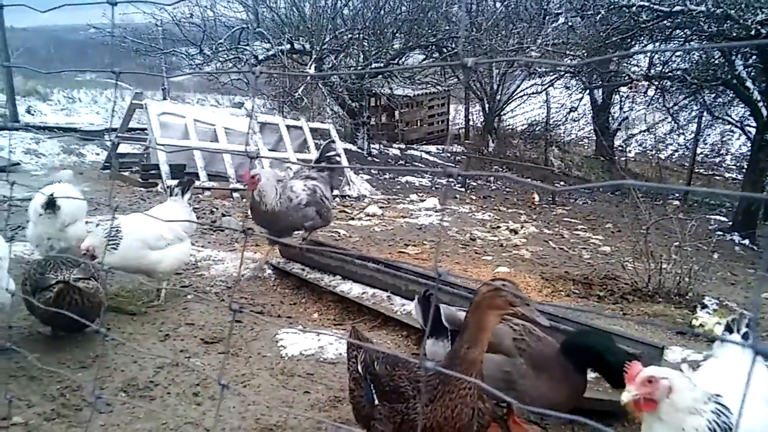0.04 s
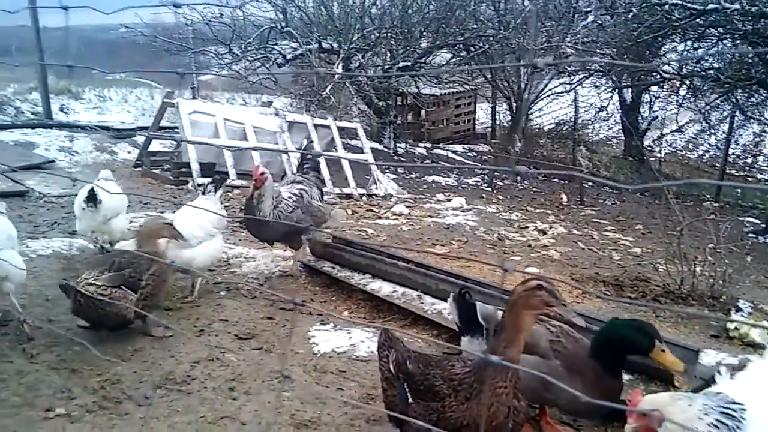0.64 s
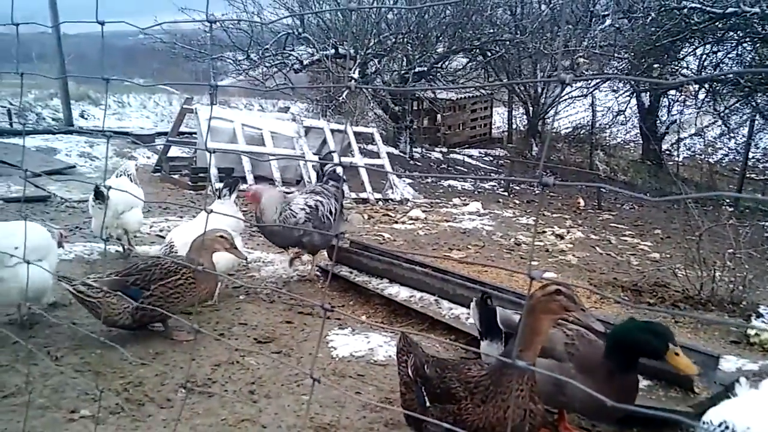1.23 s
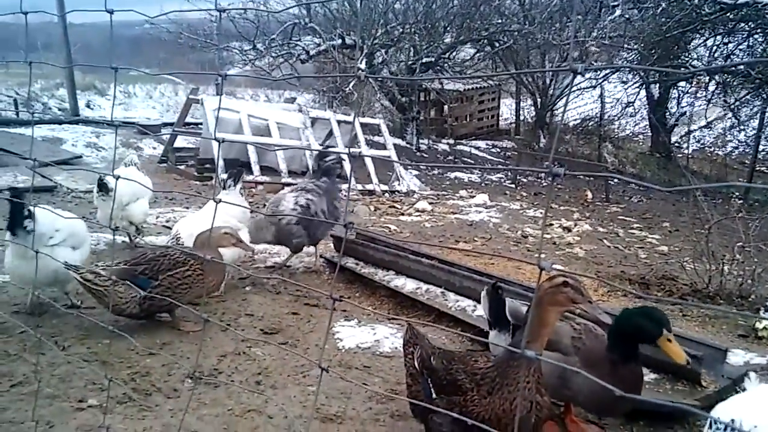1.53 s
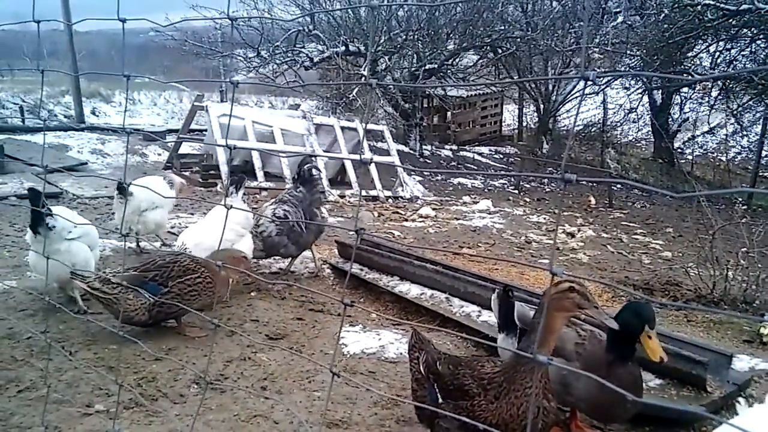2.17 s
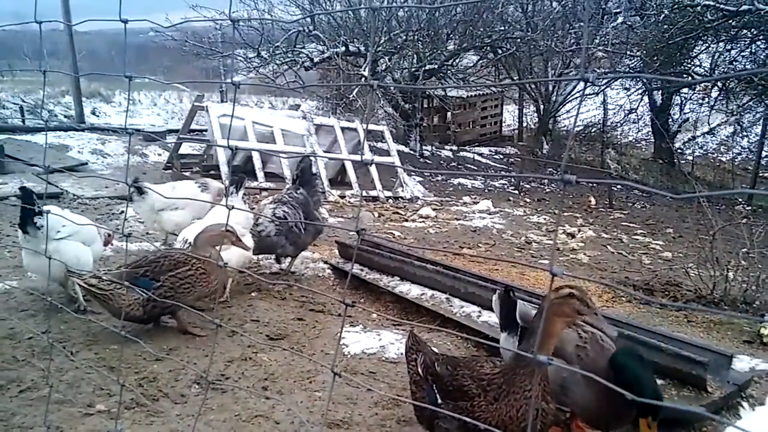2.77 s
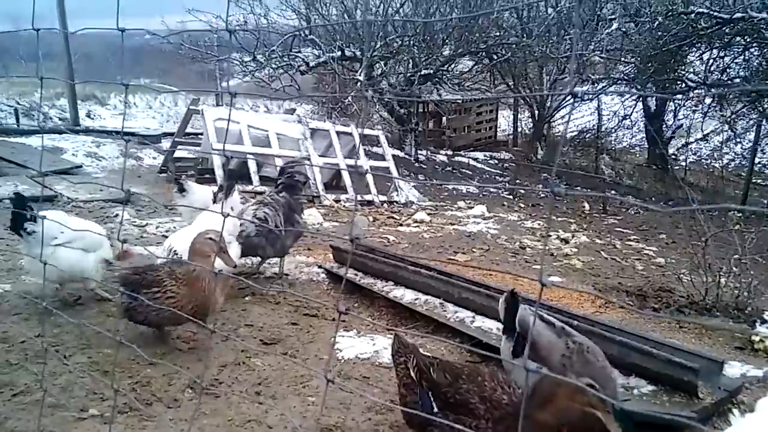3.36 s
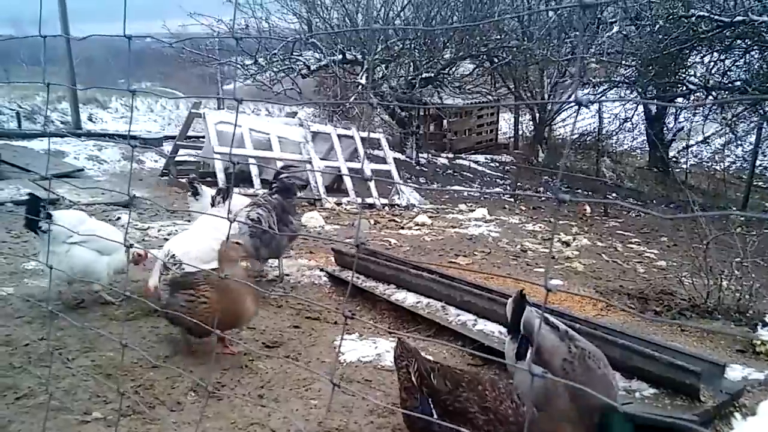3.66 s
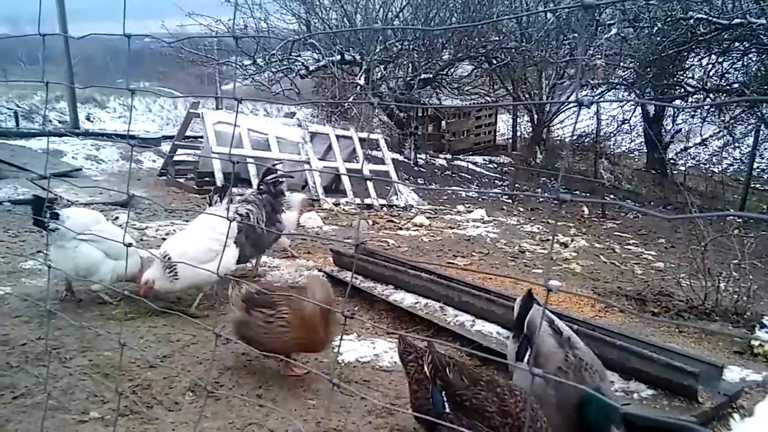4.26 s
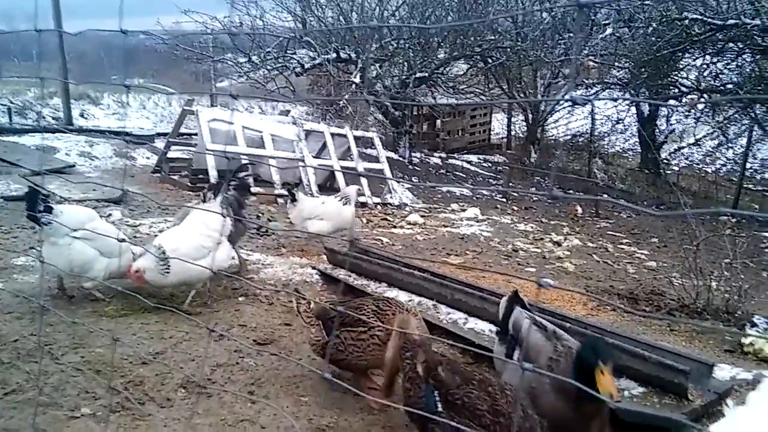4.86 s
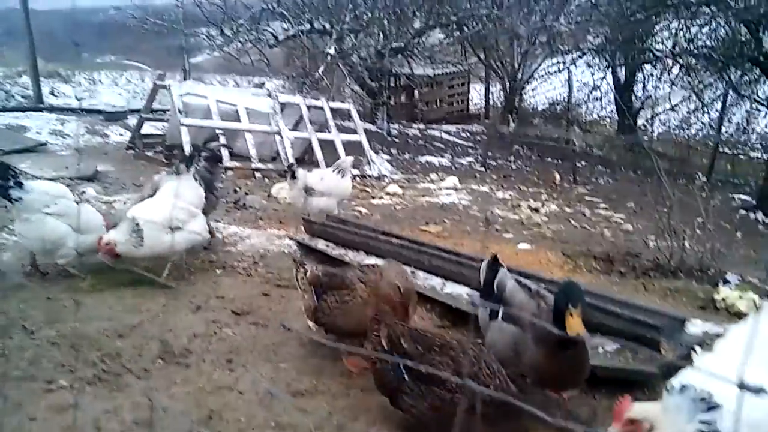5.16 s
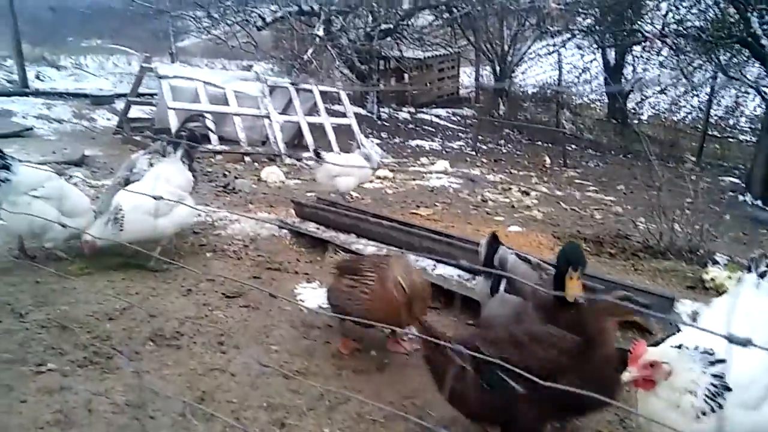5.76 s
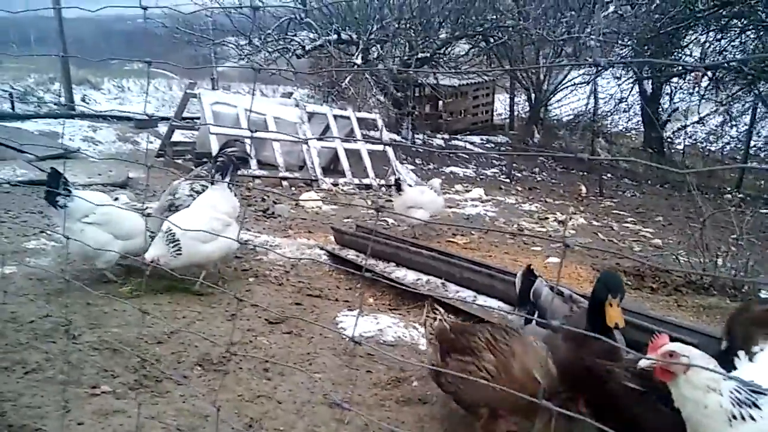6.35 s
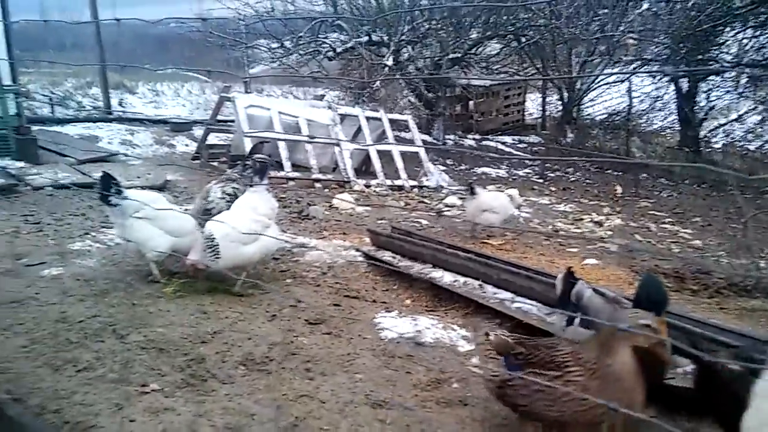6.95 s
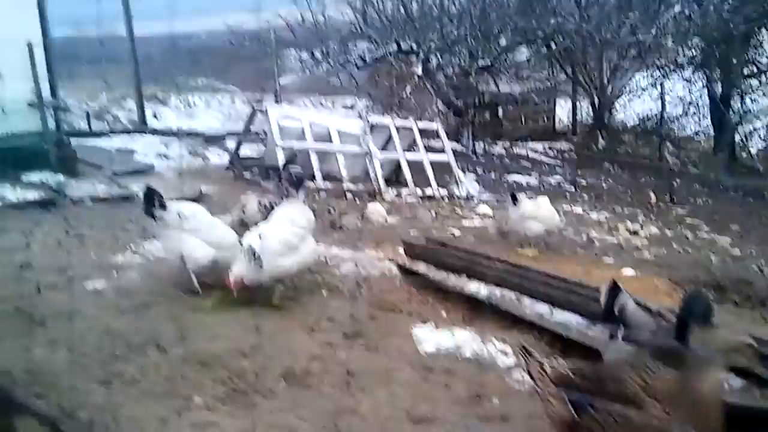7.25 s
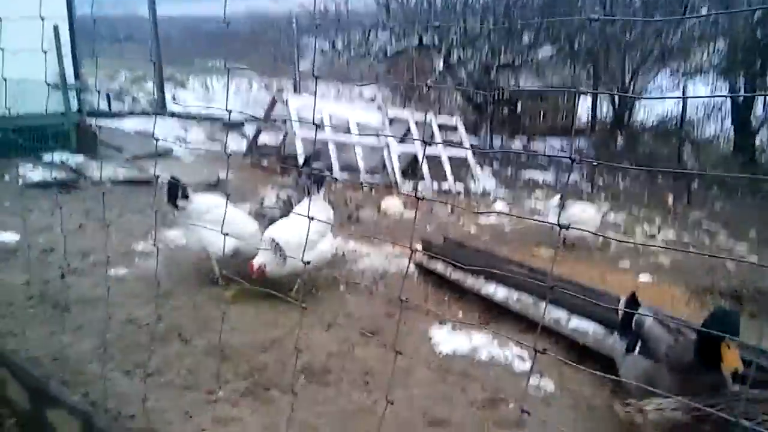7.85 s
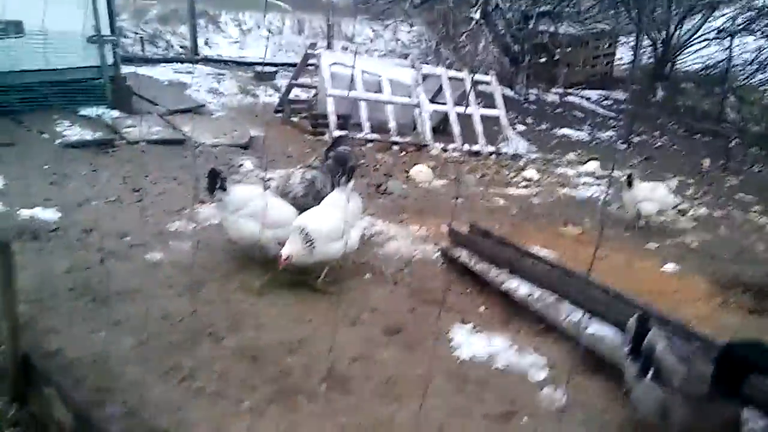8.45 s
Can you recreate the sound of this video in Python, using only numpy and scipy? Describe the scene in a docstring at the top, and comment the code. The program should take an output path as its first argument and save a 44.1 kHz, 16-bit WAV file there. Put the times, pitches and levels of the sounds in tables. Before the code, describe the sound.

A duck clucks hoarsely up close in a farmyard, with soft drake rasps, quiet hen whines and bills pecking and rustling in feed.

```python
"""Ducks and hens at a winter trough

Up close, a duck fires off hoarse clucks, uneven pulses ringing throat and bill, some breaking into a squeal.
A drake rasps in soft puffs of breath; hens whine and murmur in quavering notes. Bills tick on the trough
and rustle in the feed, and feathers brush past once. Behind the open farmyard a low rush swells and fades."""
import sys
import numpy as np
from scipy import signal
from scipy.io import wavfile

SR = 44100
rng = np.random.default_rng(int(sys.argv[2]) if len(sys.argv) > 2 else 0)


def waveform_to_disk(signal):
    """Save audio, clipped to [-1, 1], as 16-bit WAV at the path in sys.argv[1]."""
    frames = np.transpose(np.atleast_2d(signal))
    scaled = np.clip(frames, -1, 1) * 32767
    samples = np.round(scaled).astype(np.int16)
    wavfile.write(sys.argv[1], SR, samples)


N = 375291
TIME = np.arange(N) / SR

# duck clucks: peak t/s, spread/s, pitch/Hz, mouth resonance/Hz, mouth level/dB, bill over mouth/dB
DUCK_CLUCKS = [(4.192, 0.0034, 233, 1880, -17.5, -1), (4.218, 0.0063, 217.6, 1540, -33, 1),
               (4.496, 0.0021, 206.2, 1940, -26, -1), (4.63, 0.0031, 211, 1810, -41, 3),
               (4.651, 0.0032, 242.8, 1730, -19, -7.5), (4.778, 0.0043, 245.5, 1620, -20.5, 1.5),
               (5.137, 0.0062, 198, 1610, -29, 8), (5.371, .003, 284.5, 2010, -32, 1),
               (5.442, 0.0096, 277, 2020, -37.5, -1.5), (5.469, 0.008, 275.3, 1990, -21.5, 0.5),
               (5.691, 0.0069, 242.4, 1840, -18.5, -5), (5.832, 0.0066, 271, 1820, -19.5, -4.5),
               (5.964, 0.0065, 256.6, 1850, -19, 3), (6.102, 0.0041, 197, 1860, -40, 0),
               (6.135, 0.0054, 223, 1780, -21.5, -3), (6.251, 0.0025, 260, 1770, -33.5, -4.5),
               (6.277, 0.0045, 230.4, 1630, -23.5, -7), (6.78, 0.0062, 244.1, 1821, -21, -6.5)]
# resonances below and above the duck's mouth: part (0 chest, 2 bill, 3 high edge), f/Hz, width/Hz, gain/dB
DUCK_RESONANCES = [(0, 242, 168.9, 2), (0, 513, 240, -6.5), (0, 763, 300, 4.5), (2, 3236, 480, 11.5),
                   (2, 4010, 520, 12.5), (3, 5763, 1200, -4), (3, 7780, 1100, -2), (3, 11500, 3500, -18)]
# duck squeals: t/s, length/s, top pitch/Hz, level/dB
DUCK_SQUEALS = [(4.473, 0.092, 888, -34.5), (4.783, 0.107, 1010, -32.5), (5.078, 0.13, 1023, -34.5),
                (5.335, 0.023, 1276, -27.5), (5.389, 0.078, 943, -33)]
# the duck's upward squeak: t/s, length/s, first pitch/Hz, last pitch/Hz, level/dB
DUCK_SQUEAKS = [(6.405, 0.033, 1770, 3850, -36)]
# throat colour of squeal and squeak: f/Hz, gain/dB
SQUEAL_EQ = [(400, 38), (1000, -14), (1900, -21.5), (2700, -25.5), (3800, -22), (4800, -38), (9000, -49)]
# drake rasps: t/s, length/s, throat resonance/Hz, relative level/dB, buzz over throat/dB
DRAKE_RASPS = [(1.306, .024, 1380, -57, -18), (2.967, 0.034, 1470, -50, 0.5),
               (3.093, 0.045, 1510, -48.5, -3), (3.577, .049, 1350, -45, -25),
               (3.678, 0.054, 1290, -50, -34), (4.865, .056, 1620, -45, -11),
               (5.544, 0.049, 1520, -46, -13), (6.312, 0.08, 1550, -42, -9),
               (6.718, 0.031, 1570, -46.5, -9.5), (6.949, .06, 1450, -37, -9.5),
               (7.534, 0.062, 1310, -44.5, -10), (7.612, 0.034, 1360, -46, -13.5),
               (8.259, 0.049, 1340, -45, -29), (8.385, .039, 1240, -50, -26)]
# a hen's whine, its catch and soft clucks: t/s, length/s, first pitch/Hz, last pitch/Hz, level/dB
HEN_CALLS = [(0, 0.31, 432, 450, -44.5), (.3, 0.052, 408, 370, -51.5), (.342, 0.055, 402, 455, -44),
             (.59, 0.074, 401, 340, -46.5), (1.08, 0.068, 365, 310, -48.5)]
# the hen's throat colour: f/Hz, gain/dB
HEN_EQ = [(330, 13.5), (440, 1.5), (680, 12.5), (880, 6), (1300, -9.5), (1800, -21), (3000, -58),
          (5000, -50)]
# a hen's murmurs: t/s, length/s, first pitch/Hz, last pitch/Hz, level/dB
HEN_MURMURS = [(.4, 0.151, 474, 527, -56.5), (.675, .14, 473, 505, -57)]
# muffled colour of a closed beak: f/Hz, gain/dB
MURMUR_EQ = [(500, -3), (1000, -23), (2000, -28), (5000, -62)]
# pecks on grain and trough: t/s, peak level/dB, ring f/Hz
BILL_PECKS = [(.301, -34.5, 3430), (0.724, -35, 2464), (1.457, -42, 470), (1.505, -32, 3900),
              (1.694, -41, 4300), (1.736, -34.5, 6700), (2.001, -32.5, 11400), (3.42, -37.5, 6050),
              (4.393, -23.5, 3360), (4.412, -31, 2140), (4.74, -26.5, 3280), (4.962, -28, 5900),
              (6.458, -27, 740), (6.465, -33.5, 5500), (7.507, -26.5, 5060), (7.851, -31.5, 2360),
              (8.478, -36.5, 2414)]
# quick scrapes of a bill in the feed: t/s, relative level/dB
BILL_SCRAPES = [(.048, -48), (0.089, -45.5), (.154, -44.5), (0.27, -44.5), (.42, -46), (.665, -46.5),
                (1.051, -45.5), (1.113, -44.5), (2.937, -44), (4.095, -48.5), (6.458, -38.5)]
# bouts of dabbling and shuffling: t/s, length/s, relative level/dB
DABBLING_BOUTS = [(0, 0.56, -54), (0.96, 0.64, -57.5), (1.74, 0.22, -59.5), (2.53, .14, -61),
                  (2.89, 0.15, -64), (3.237, 0.22, -66.5), (4.003, 0.92, -60.5), (4.724, 0.39, -55),
                  (5.4, 0.976, -60), (6.34, 0.87, -58), (7.295, 0.4, -62.5), (7.814, 0.76, -61.5)]
# colour of the rustling feed: f/Hz, gain/dB
FEED_EQ = [(1000, 3), (2000, -13), (2900, -13.5), (3800, 3.5), (4600, -15), (5400, -21.5), (6600, 8.5),
           (8000, 4), (10000, -1.5), (16000, -6)]
# resonances of brushing feathers: f/Hz, width/Hz, gain/dB
FEATHER_RESONANCES = [(3500, 1000, 0), (6400, 910, -3), (10000, 4000, -11)]
# swell of the distant rush: t/s, drone level/dB, mids level/dB
RUSH_SWELL = [(0.9, -74, -70), (2.19, -65.5, -68), (2.42, -64.5, -71.5), (3.48, -54, -63),
              (3.67, -52.5, -58), (4.62, -46, -47), (5.26, -45.5, -49), (5.75, -48.5, -51),
              (6.51, -41.5, -46), (6.95, -51.5, -46.5), (7.76, -51, -62), (8.5, -62.5, -60.5)]
# swell of its hiss: t/s, level/dB
HISS_SWELL = [(2.3, -70.5), (3.2, -57.5), (3.8, -61.5), (5.3, -53.5), (7.7, -65), (8.5, -62.5)]
# colours of the rush's rumble, mids and hiss: f/Hz, gain/dB
RUMBLE_EQ = [(42, -24.5), (62, -10), (130, 2), (220, -1), (450, -10.5)]
MIDS_EQ = [(300, -20), (480, 1), (650, -2), (1000, -6.5), (1400, -19), (2500, -50)]
HISS_EQ = [(900, -16), (1400, 0), (2050, 5), (2700, -7.5), (3500, -7.5), (5000, -18)]


def duck_clucks(jitter=.05, sag=.028, shimmer_db=1.9, whistle=.016, mouth_width_hz=460, split=.14, closing=1.8):
    """Each cluck catches with a falling whistle, then slowing, uneven pulses ring throat and bill."""
    out, t, count = np.zeros(N), np.arange(-SR // 20, SR // 10) / SR, np.arange(-7, 13)
    for s, spread, pitch, mouth_hz, mouth_db, bill_over_db in DUCK_CLUCKS:
        times = (count + sag * count ** 2 + jitter * rng.standard_normal(len(count))) / pitch
        swell = np.exp(-(times / (2 * spread)) ** 2)
        linger = .054 * np.exp(-(times / (2 * spread) - 1.4) ** 2)
        creak = .05 * np.exp(-(times / (3.9 * spread)) ** 2)   # weak pulses lead in and out
        sizes = (swell + linger + creak) * from_db(shimmer_db * rng.standard_normal(len(count)))
        slaps = membrane_pulses(t, times, sizes)
        catch = whistle * np.exp(-((t + 2.1 * spread) / (.99 * spread)) ** 2)
        phase = 2 * np.pi * np.cumsum(950 * np.exp(-t / .053)) / SR
        breathy_tone = rng.standard_normal(len(t)) / 2 + sum(np.sin(k * phase) for k in range(1, 5))
        source = (slaps + catch * breathy_tone) * np.clip(t / spread / 2 + 2, 0, 1)
        # the mouth adds a close pair of resonances as part 1
        mouth_pair = [(1, mouth_hz * (1 - split), mouth_width_hz, .0059),
                      (1, mouth_hz * (1 + split), mouth_width_hz, .0046)]
        parts = np.zeros((4, len(t)))
        for k, (part, hz, width, db) in enumerate(DUCK_RESONANCES + mouth_pair):
            ring = resonate(resonate(source, hz, width), hz, width * 2)
            parts[round(part)] += (-1) ** k * from_db(db) * rms_one(ring)
        chest, mouth, bill, edge = parts
        mouth = np.interp(t - closing * t ** 2, t, mouth)   # its ring sinks as it closes
        bill = np.interp(t - .0009, t, bill)   # rings a moment after the throat
        # against a full cluck at -19 dB, a weak one keeps more chest and loses its edge
        effort_db, bill_db = mouth_db + 19, mouth_db + bill_over_db
        layers = [(chest, -24 + .51 * effort_db), (mouth, mouth_db),
                  (bill, bill_db), (edge, bill_db - 13 + .25 * effort_db)]
        fill = np.sqrt(spread * np.sqrt(2 * np.pi) * SR / len(t))   # levels refer to the cluck's core
        add(out, s + t[0], fill * sum(from_db(db) * rms_one(layer) for layer, db in layers))
    return out


def membrane_pulses(t, times, sizes, breath=.1, puff_s=.0018):
    """Sharp slaps of the duck's membranes, each followed by a dying puff of air."""
    clicks = np.zeros(len(t))
    clicks[np.clip(np.searchsorted(t, times), 0, len(t) - 1)] = sizes
    puffs = signal.lfilter([1], [1, -np.exp(-1 / (puff_s * SR))], clicks)
    return clicks + breath * puffs * rng.standard_normal(len(t))


def duck_squeals(top_s=.05, rise=.133, fall_s=.07, fade_db_per_s=200):
    """The pitch arches to a top, then falls and fades; a short squeal breaks off on the way up."""
    out = np.zeros(N)
    for s, length, top_hz, db in DUCK_SQUEALS:
        t = np.arange(round(length * SR)) / SR
        before, after = np.maximum(top_s - t, 0), np.maximum(t - top_s, 0)
        pitch = top_hz * (1 - rise * (before / top_s) ** 2) * np.exp(-(after / fall_s) ** 2)
        level = from_db(db - fade_db_per_s * after) * gate(t, length, attack_s=.015, release_s=.0086)
        add(out, s, level * voice(pitch, SQUEAL_EQ, waver=.028, rough=.35))
    return out


def drake_rasps(pulse_hz=63, throat_width_hz=330, arch=.24, trim_db=-4.5):
    """Slow, separate puffs of breath; the throat opens and closes over each rasp."""
    out, t = np.zeros(N), np.arange(SR // 30) / SR
    puff = t / .0028 * np.exp(-t / .0019) + .091 * np.exp(-t / .023)
    for start, length, hz, throat_db, buzz_db in DRAKE_RASPS:
        times = start + np.linspace(0, length, round(length * pulse_hz) + 1)
        opening = np.sin(np.pi * (np.arange(len(times)) + .5) / (len(times) + .061))
        for s, effort in zip(times, rms_one(opening)):
            air = puff * rng.standard_normal(len(t))
            centre_hz = hz * (1 + arch * (effort - 1))   # stronger pulses open the throat
            throat = resonate(resonate(air, centre_hz, throat_width_hz), centre_hz, 890)
            buzz = .39 * resonate(air, 2960, 270) + resonate(air, 3520, 200) + .5 * resonate(air, 4850, 440)
            rasp = rms_one(throat) + from_db(buzz_db) * rms_one(band(buzz, 2300, 4150))
            add(out, s - .003, from_db(throat_db + trim_db) * effort * np.sqrt(pulse_hz * t[-1]) * rasp)
    return out


def bird_notes(rows, throat, quaver_hz=12.44, quaver=.032):
    """Slightly hoarse hen or duck notes that quaver as they glide from one pitch to another."""
    out = np.zeros(N)
    for s, length, first_hz, last_hz, db in rows:
        t = np.arange(round(length * SR)) / SR
        pitch = np.geomspace(first_hz, last_hz, len(t)) * (1 + quaver * np.cos(2 * np.pi * quaver_hz * t))
        level = from_db(db) * gate(t, length, attack_s=.016, release_s=.031)
        add(out, s, level * voice(pitch, throat, waver=.017, rough=.18))
    return out


def voice(pitch, throat, waver, rough):
    """Ten harmonics of a wavering pitch, coloured by the throat, levelled and then roughened."""
    pitch = pitch * (1 + waver * drift(382)[:len(pitch)])
    phase, k = 2 * np.pi * np.cumsum(pitch) / SR, np.arange(1, 11)[:, None]
    gains = from_db(at_hz(throat, k * pitch)) * (k * pitch < SR / 2)
    tone = np.sum(gains * np.sin(k * phase + rng.uniform(0, 2 * np.pi, k.shape)), axis=0)
    return tone / np.sqrt(np.sum(gains ** 2, axis=0) / 2) * (1 + rough * drift(600)[:len(pitch)])


def pecks(crack_s=.00055, damping=.11, edge_db=-8):
    """A bill tip cracks on grain or trough, which rings for a few cycles; low knocks are duller."""
    out, t = np.zeros(N), np.arange(SR // 20) / SR
    for s, db, hz in BILL_PECKS:
        crack = rng.standard_normal(len(t)) * (np.exp(-t / crack_s) + .16 * np.exp(-t / .0082))
        ring = resonate(resonate(crack, hz, hz * damping), hz, hz)
        tick = rms_one(ring) + from_db(edge_db) * hz / 3000 * rms_one(band(crack, 6700, 9600))
        add(out, s, from_db(db) * tick / abs(tick).max())
    return out


def feed_rustle(grain_db=3.5, ring_db=4.5, ticks_per_s=22, tick_size=1.7, tick_s=.0018):
    """Grainy dabbling dotted with tiny ticks; louder scrapes stand out, duller than the rustle, and ring the
    bill."""
    grain = rms_one(from_db(grain_db * drift(300)))
    kicks = (rng.random(N) < ticks_per_s / SR) * np.minimum(rng.exponential(1, N), 2)
    ticks = signal.lfilter([tick_size], [1, -np.exp(-1 / (tick_s * SR))], kicks + 1e-18)
    nibbling = from_db(.9 * drift(30)) + ticks
    rustle = dabbling() * nibbling * coloured(FEED_EQ, patchy_db=2, rate=41)
    strokes = sum(from_db(db) * np.exp(-2 * ((TIME - s) / .015) ** 2) for s, db in BILL_SCRAPES)
    scrape = band(coloured(FEED_EQ, patchy_db=6.5, rate=60), 1600, 11000)
    bill_ring = from_db(ring_db) * resonate(scrape, 3590, 270)
    return grain * (rustle + strokes * rms_one(scrape + bill_ring))


def dabbling(rise_db_per_s=244, fall_db_per_s=30, idle_db=-77):
    """The rustle's envelope: each bout comes in fast, holds and tails off to a faint floor."""
    bouts_db = [db - rise_db_per_s * np.maximum(s - TIME, 0)
                - fall_db_per_s * np.maximum(TIME - s - length, 0) for s, length, db in DABBLING_BOUTS]
    return from_db(np.maximum(np.max(bouts_db, axis=0), idle_db))


def feathers(at_s=7.108, spread_s=.039, level_db=-41.5, grain_db=3):
    """One soft swish of friction as the birds push past each other."""
    swish = np.exp(-((TIME - at_s) / spread_s) ** 4) * from_db(grain_db * drift(200))
    friction = band(rng.standard_normal(N), 1700, 8500)
    brush = sum(from_db(db) * resonate(friction, hz, width) for hz, width, db in FEATHER_RESONANCES)
    return from_db(level_db) * swish * rms_one(brush)


def distant_rush(from_hz=342, to_hz=261, pass_s=4.9, glide_s=.7, rumble_db=-60, follow=.49, lag_s=.3):
    """A noisy drone sinks as the rush goes by, under mids and hiss; the rumble swells later and less."""
    drone_db, mids_db = in_time(RUSH_SWELL)
    hiss_db, = in_time(HISS_SWELL)
    drone_hz = from_hz + (to_hz - from_hz) * (1 + np.tanh((TIME - pass_s) / glide_s)) / 2
    wander = signal.sosfilt(signal.butter(3, 78, fs=SR, output="sos"), rng.standard_normal((2, N)))
    phase = 2 * np.pi * np.cumsum(drone_hz) / SR
    drone = rms_one(wander[0] * np.cos(phase) + wander[1] * np.sin(phase))   # a narrow band of noise
    late_swell_db = np.interp(TIME - lag_s, TIME, drone_db) - drone_db.mean()
    rumble = from_db(rumble_db + follow * late_swell_db) * coloured(RUMBLE_EQ, patchy_db=2.5, rate=16)
    mids = from_db(mids_db) * coloured(MIDS_EQ, patchy_db=1.6, rate=12)
    hiss = from_db(hiss_db) * coloured(HISS_EQ, patchy_db=3.5, rate=57)
    return rumble + from_db(drone_db) * drone + mids + hiss


def mic_air(level_db=-70, centre_hz=89):
    """A faint, steady low bed of air moving on the microphone."""
    return from_db(level_db) * rms_one(band(rng.standard_normal(N), centre_hz / 2, centre_hz * 2))


def yard(x, ground_s=.002079, ground_db=-12, scatter_db=-21, t60_s=.13):
    """A bounce off the ground, then a short scatter from trough and fence."""
    t = np.arange(SR // 2) / SR
    tail = band(rng.standard_normal(len(t)), 220, 3800) * from_db(-60 * t / t60_s) * (t > .005)
    scatter = signal.fftconvolve(x, tail / np.sqrt(np.sum(tail ** 2)))[:N]
    return x + from_db(ground_db) * np.interp(TIME - ground_s, TIME, x) + from_db(scatter_db) * scatter


def from_db(db):
    return 10 ** (np.asarray(db) / 20)


def rms_one(x):
    return x / np.sqrt(np.mean(x ** 2) + 1e-20)


def at_hz(eq, hz):
    """An EQ curve's gain in dB, read on a log-frequency axis."""
    f, db = np.transpose(eq)
    return np.interp(np.log(hz), np.log(f), db)


def in_time(rows):
    """Each column of an automation curve at every sample."""
    s, *columns = np.transpose(rows)
    return [np.interp(TIME, s, c) for c in columns]


def add(out, s, sound):
    """Mix a sound in from time s on."""
    start = max(round(s * SR), 0)
    out[start:start + len(sound)] += sound[:max(N - start, 0)]


def gate(t, length, attack_s, release_s):
    """A linear attack, hold and release."""
    return np.clip(np.minimum(t / attack_s, (length - t) / release_s), 0, 1)


def drift(rate):
    """Random modulation gliding through `rate` values a second; rms 1."""
    knots = rng.standard_normal(4096)
    return rms_one(np.interp(TIME * rate, np.arange(len(knots)), knots))


def resonate(x, hz, width_hz):
    """A two-pole resonance with unity gain at its peak."""
    r = np.exp(-np.pi * width_hz / SR)
    feedback = [1, -2 * r * np.cos(2 * np.pi * hz / SR), r * r]
    return signal.lfilter(np.array([1, 0, -1]) * (1 - r * r) / 2, feedback, x + 1e-18)


def band(x, low_hz, high_hz):
    return signal.sosfilt(signal.butter(2, [low_hz, high_hz], "band", fs=SR, output="sos"), x)


def coloured(eq, patchy_db, rate):
    """Narrow bands of noise along an EQ curve, each flickering by itself; rms 1."""
    edges = np.geomspace(eq[0][0], eq[-1][0], 2 * len(eq) + 1)
    white, out = rng.standard_normal((2, N)), 0
    for k, (low, high) in enumerate(zip(edges, edges[1:])):
        gain_db = at_hz(eq, np.sqrt(low * high)) + patchy_db * drift(rate)
        out = out + band(white[k % 2], low, high) * from_db(gain_db)
    return rms_one(out)


def scene():
    """Calls and pecks share the yard's reflections; rustle, rush and air lie dry beneath them."""
    ducks = duck_clucks() + drake_rasps() + duck_squeals() + bird_notes(DUCK_SQUEAKS, SQUEAL_EQ)
    hens = bird_notes(HEN_CALLS, HEN_EQ) + bird_notes(HEN_MURMURS, MURMUR_EQ)
    return (yard(ducks + hens + pecks()) + feed_rustle() + feathers() + distant_rush() + mic_air())[None]


def record(dry, low_cut_hz=48, high_cut_hz=15900):
    """The microphone drops the lowest bass; the top is cut steeply."""
    thin = signal.sosfilt(signal.butter(4, low_cut_hz, "high", fs=SR, output="sos"), dry)
    return signal.sosfilt(signal.ellip(10, .2, 70, high_cut_hz, fs=SR, output="sos"), thin)


dry = scene()
out = record(dry)
waveform_to_disk(out)
```